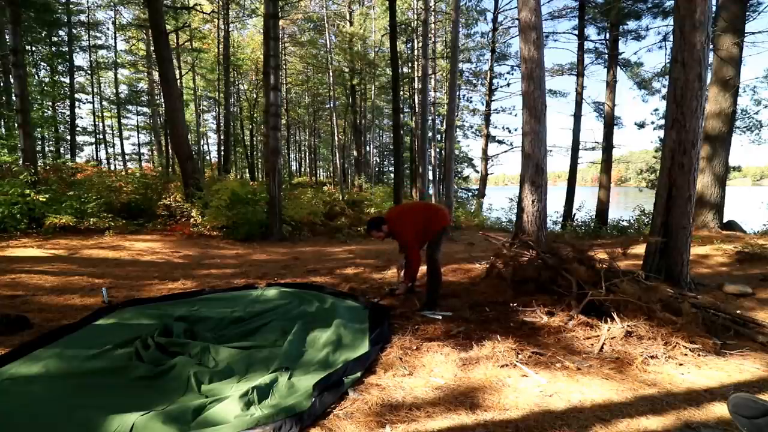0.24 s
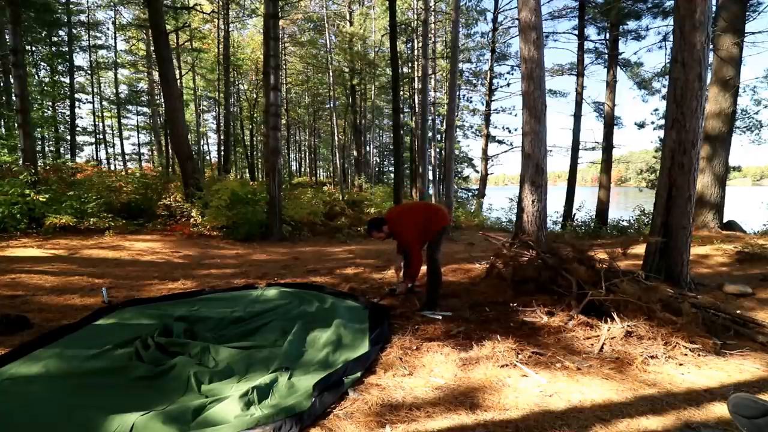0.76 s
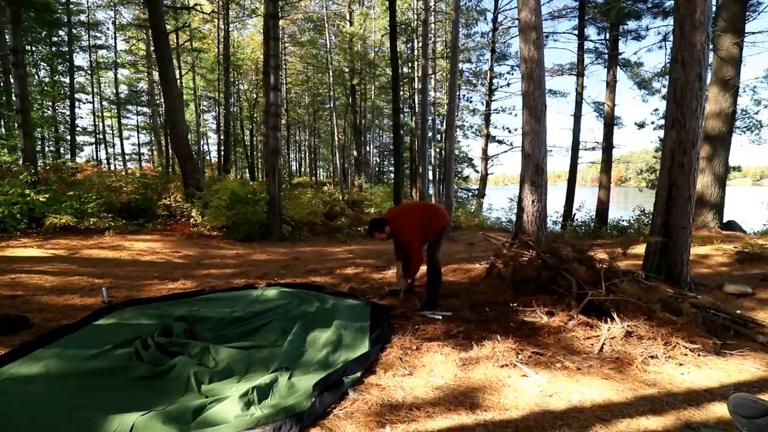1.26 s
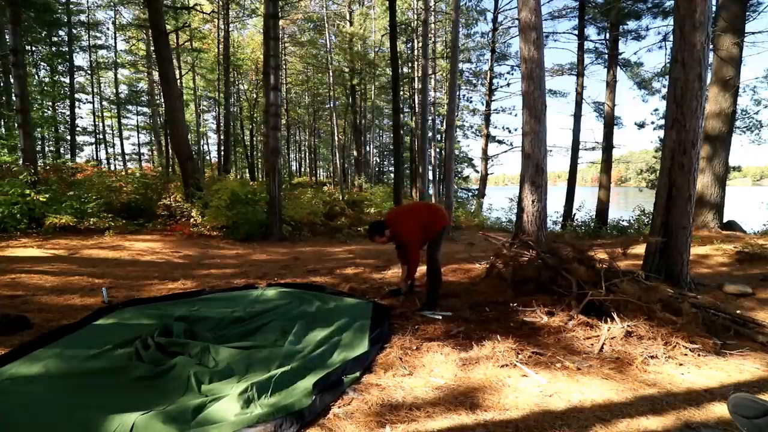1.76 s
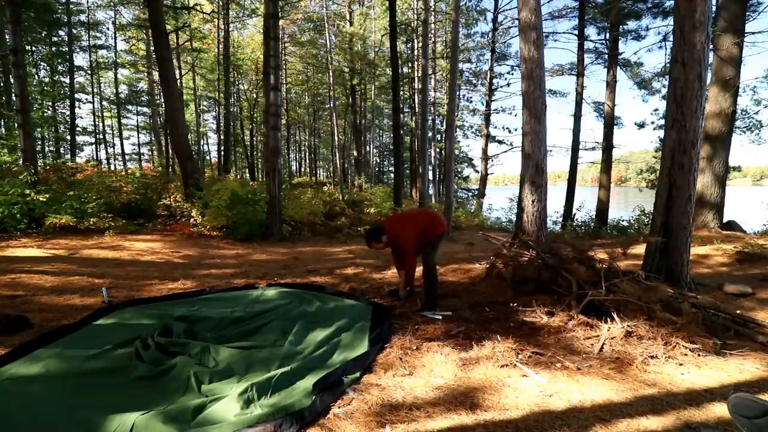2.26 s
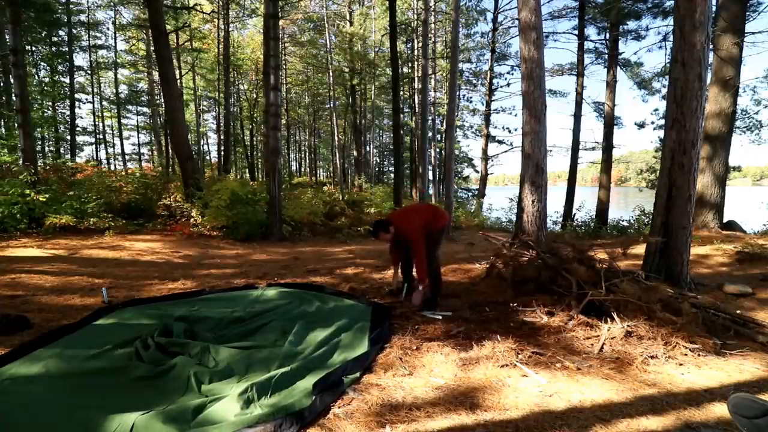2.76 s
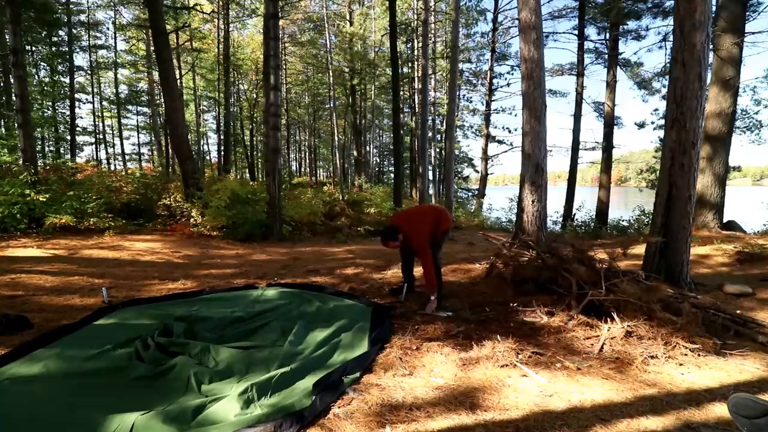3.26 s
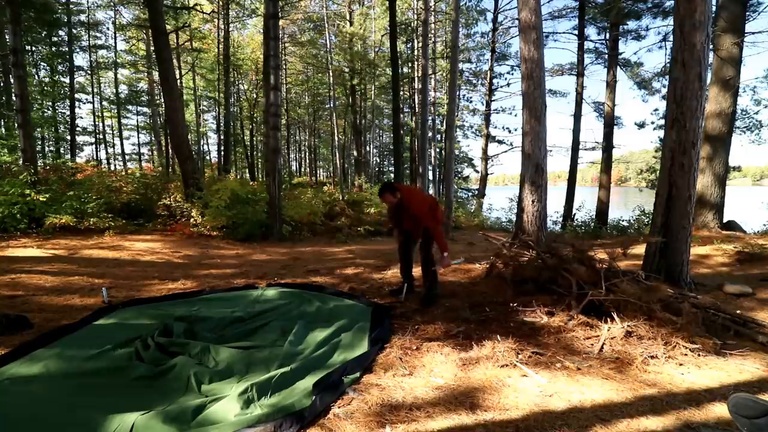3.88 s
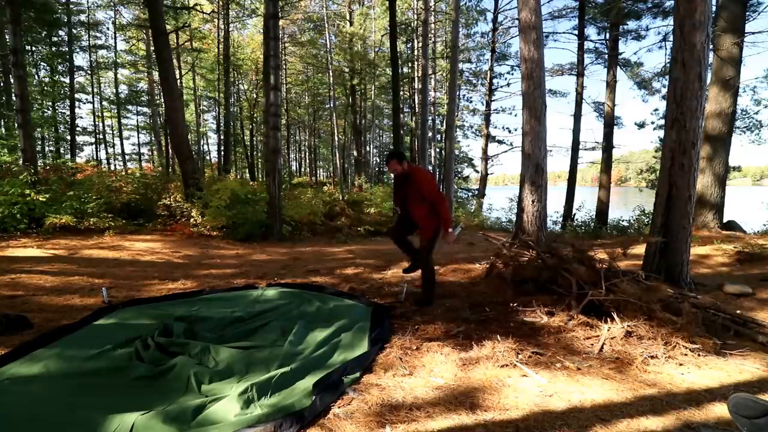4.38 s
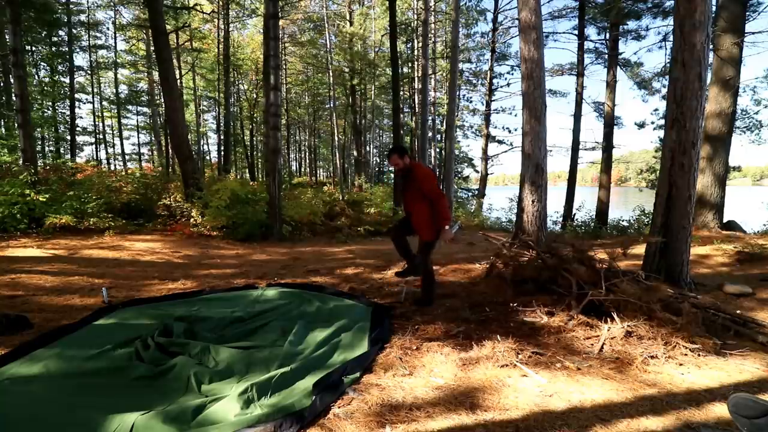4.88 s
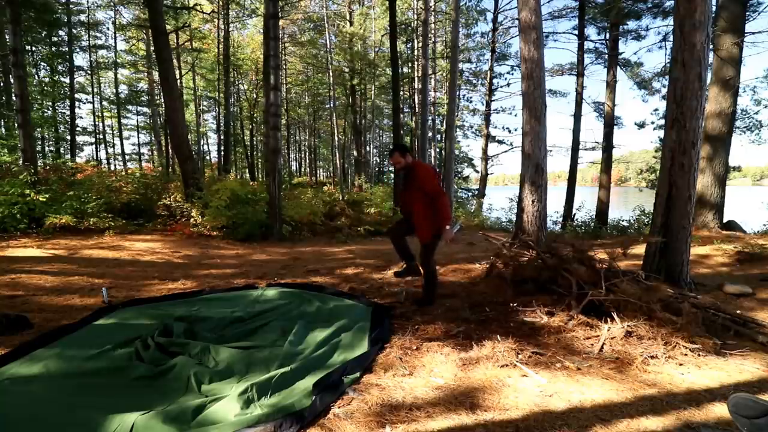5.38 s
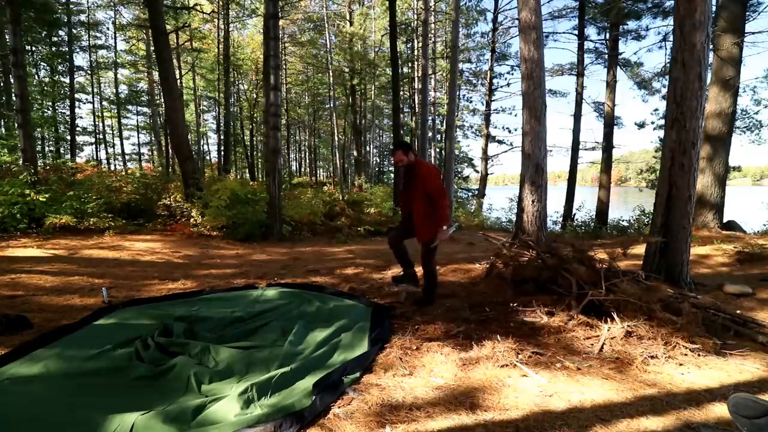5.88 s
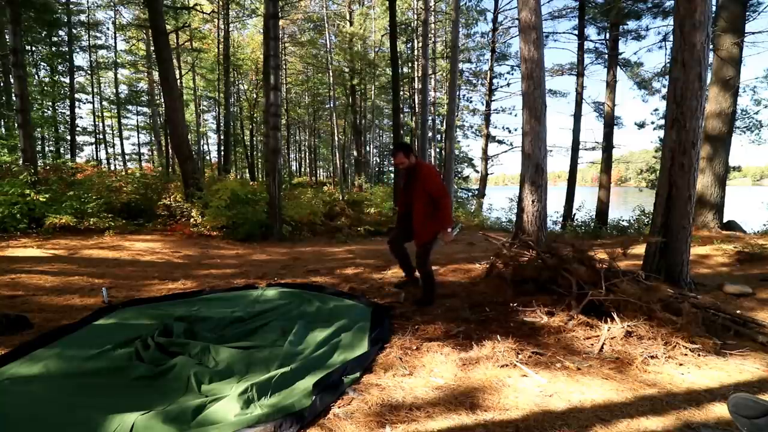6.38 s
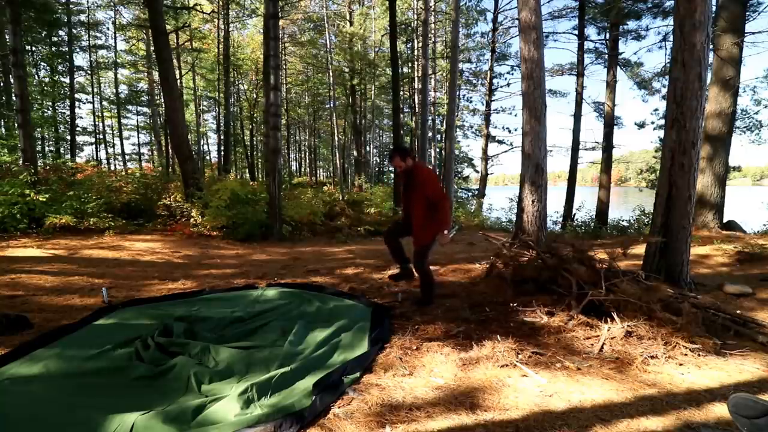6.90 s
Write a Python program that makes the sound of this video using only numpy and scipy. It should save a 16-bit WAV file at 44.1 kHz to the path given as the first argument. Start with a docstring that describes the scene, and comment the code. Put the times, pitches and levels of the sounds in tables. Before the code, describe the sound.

Quiet lakeside pine wood with low hum, distant rush and thin hiss. A tiny water plop, then faint scuffs and rustles in dry needles with a few small ticks. Just after three seconds, thin metal stakes clink and clatter in a hand for about a second. From four and a half seconds a boot stamps about every half second, much louder, with low thuds and brittle twig snaps. Close, with slight scatter from the trunks.

```python
"""Tent stakes and a boot on needle litter

A camper in a pine wood by a lake scuffs the litter (enveloped noise), gathers four thin metal stakes that clink and
clatter (decaying bending modes and contact noise), then stamps one into the ground with a boot (low swings and
rumble, snapping twigs). Trunks scatter the sound; a low hum, drones, a far rush, plops and hiss lie under it."""
import sys
import numpy as np
from scipy import signal
from scipy.fft import rfft, irfft, next_fast_len
from scipy.io import wavfile
from scipy.ndimage import map_coordinates

SR = 44100
rng = np.random.default_rng(int(sys.argv[2]) if len(sys.argv) > 2 else 0)


def log_audio(samples):
    """Write samples as a 16-bit WAV file to the path given in sys.argv[1]."""
    # one column per channel
    frames = np.atleast_2d(samples).T
    # limit to full scale, then quantise
    limited = np.clip(frames, -1, 1)
    pcm = np.round(limited * 32767).astype(np.int16)
    wavfile.write(sys.argv[1], SR, pcm)


N = 315086

# Boot landings. Each row: start in seconds, edge of the sole in dB, flat of the sole in dB, settling in dB,
# ground pitch in Hz, crunch of the needles in dB
THUDS = [(2.328, -27, -33, -42, 359, -51), (2.78, -49, -42, -38, 407, -62),
         (2.828, -35, -39, -29.5, 366, -63), (2.9, -39.5, -54, -60, 350, -61),
         (3.989, -33, -55, -53, 463, -64.5), (4.064, -24.5, -35.5, -38, 368, -44),
         (4.584, -18, -13, -32, 310, -48), (4.6108, -13.5, -25, -27.5, 460, -47.5),
         (4.6334, -21, -31, -48, 279, -63), (5.0677, -9, -13.5, -21.5, 293, -38.5),
         (5.092, -27, -30, -29, 360, -64), (5.119, -26, -41, -43, 196, -68),
         (5.614, -19.5, -15, -22, 340, -51.5), (5.633, -18, -30, -32, 260, -48.5),
         (6.0745, -18.5, -21.5, -27.5, 404, -44), (6.503, -13.5, -11.5, -21, 330, -41),
         (7.0626, -13.5, -11, -25, 315, -35.5), (7.099, -22, -26, -39, 523, -64)]
# Spectrum of bright rubbing. Each row: frequency in Hz, density in dB per Hz before scaling to rms 1
RUSTLE_SPECTRUM = [(1470, -37), (2500, -11.5), (4410, -5.5), (4910, -6.5), (8080, -4), (9960, -12.5),
                   (16000, -17)]


def amp(db):
    """Decibel law: gain of a level in dB."""
    return 10 ** (np.asarray(db) / 20)


def decay(t, t60):
    """Exponential decay: falls 60 dB in t60 seconds."""
    return amp(-60 * t / t60)


def swell_in(t, rise_s):
    """Exponential approach to 1 with time constant rise_s."""
    return 1 - np.exp(-t / rise_s)


def unit(x):
    """Power normalisation: x at rms 1."""
    return x / np.sqrt(np.mean(x ** 2) + 1e-20)


def along(points, hz):
    """Interpolation of (Hz, value) points on a logarithmic frequency axis."""
    f, v = np.transpose(points)
    return np.interp(np.log(hz + 1), np.log(f + 1), v)


def curves(rows, **ends):
    """Linear interpolation in time: one value per sample for each column after the time."""
    s, *cols = np.transpose(rows)
    return [np.interp(np.arange(N) / SR, s, c, **ends) for c in cols]


def wobble(rate):
    """Band-limited fluctuation: a smooth random curve with rate knots a second."""
    return map_coordinates(rng.standard_normal(int(N * rate / SR) + 4), [np.arange(N) * rate / SR])


def filtered(x, response):
    """Linear filtering: the spectrum of x times a response of frequency."""
    m = next_fast_len(N + SR // 2)
    return irfft(rfft(x, m) * response(np.fft.rfftfreq(m, 1 / SR)), m)[..., :N]


def butter(x, edge_hz, kind):
    """Second-order Butterworth filter."""
    return signal.sosfilt(signal.butter(2, edge_hz, kind, fs=SR, output="sos"), x)


def resonances(modes):
    """Sum of damped oscillator responses, each given as centre in Hz, width in Hz and peak in dB."""
    return lambda f: sum(amp(db) * 1j * f * w / (c * c - f * f + 1j * f * w) for c, w, db in modes)


def grit(spectrum, spiky_db, clump_rate):
    """Modulated noise: uneven grains coloured by a spectrum, at rms 1."""
    grains = rng.standard_normal(N) * amp(spiky_db * wobble(clump_rate))
    return unit(filtered(grains, lambda hz: amp(along(spectrum, hz))))


def add(track, s, sound):
    """Superposition: mixes a sound in from time s."""
    part = track[round(s * SR):][:len(sound)]
    part += sound[:len(part)]


def stakes():
    """Modal synthesis: each clink excites bending modes, a tick and a rattle; later contacts damp the ring."""
    # Bending modes. Each row: nominal mode frequencies of one stake in Hz; the last stake is held tightest
    mode_hz = [
        [834, 1210, 1954, 2430, 3214, 4180, 4292, 4795, 6481, 7952, 8295, 9425, 10270, 11890],
        [1136, 1863, 2266, 2450, 3161, 4583, 4644, 5950, 6155, 6375, 8062, 9245, 10020],
        [3205, 4105, 5816, 6215, 7748, 8740, 8888, 12558, 13720, 14690, 15200],
        [1950, 2315, 2465, 2540, 2850, 3195, 3430, 3600, 4230, 4420, 5900, 6190, 6670, 8400],
    ]
    # Strength of the same modes. Each row: one stake, as pairs of relative level in dB and free t60 in seconds
    mode_rings = [
        [(-18.5, 0.25), (-21, 0.16), (-14.5, 0.35), (-16, 0.25), (-13.5, 0.22), (-25, 0.14), (-7, 0.14),
         (-12.5, 0.35), (-3.5, .15), (-7, 0.165), (-4.5, 0.14), (-10.5, 0.086), (-15.5, 0.22), (-20, 0.16)],
        [(-22.5, .15), (-19, .2), (-24, 0.3), (-11, 0.33), (-10, 0.33), (-12, .13), (-8, 0.64), (-25, 0.38),
         (-1, 0.12), (-6, 0.194), (-25, 0.12), (-2.5, 0.13), (-15.5, 0.091)],
        [(-22, .25), (-10, 0.41), (2, 0.17), (-5, 0.3), (-6, .22), (-13.5, 0.39), (-3, 0.27), (-11.5, 0.19),
         (-22.5, 0.25), (-24, .12), (-19, 0.173)],
        [(-14.5, 0.17), (-30.5, 0.13), (-9.5, 0.293), (-5, 0.12), (-14, 0.092), (-5, 0.166), (-4.5, 0.099),
         (-12, 0.11), (-2, 0.12), (-23, 0.051), (-22, 0.104), (-21, 0.071), (-49, 0.052), (-22.5, 0.05)],
    ]
    # Contacts. Each row: start in seconds, relative level of each of the four stakes in dB, grip from 0 to 1,
    # tilt in dB per octave, tick in dB before its band filter, rattle in dB, steady time of the rattle in seconds
    clinks = [(3.076, -46.5, -57, -45.5, -40, 0, -2.5, -48, -58, 0.012),
              (3.094, -21.5, -47, -32.5, -54, 0, -3, -22, -41, 0.037),
              (3.141, -33.5, -44.5, -30.5, -29, 0.43, -1.5, -34, -33, 0.016),
              (3.3027, -23.5, -20, -34.5, -48, 0, 0.5, -29, -24.5, 0.0038),
              (3.312, -35, -17.5, -26.5, -33, 0.099, -0.5, -27.5, -30.5, .012),
              (3.413, -22.5, -17, -11.5, -35, 0.19, -1.5, -8, -28.5, .012),
              (3.43, -12.5, -17, -20, -17.5, 0, 4, 1, -27, 0.012),
              (3.456, -40.5, -29.5, -10.5, -35, 0.17, -5, -16, -30.5, 0.012),
              (3.502, -25.5, -44, -27, -40, 0.2, -1, -28, -42, 0.055),
              (3.612, -27.5, -44, -35, -42, 1, 6.5, -20.5, -35.5, 0.025),
              (3.632, -26, -51, -52, -47, 0.091, 0.5, -44.5, -36, 0.047),
              (3.691, -48, -48, -48, -31.5, 0.066, 4, -47, -43, 0.032),
              (3.719, -55, -48, -45, -56, 0.49, -5, -53, -40.5, 0.027),
              (3.747, -50, -48, -57, -34.5, 0.017, -.5, -44, -42.5, 0.014),
              (3.865, -60, -43, -54, -33.5, 0.33, -3, -29, -45, 0.0082),
              (4.03, -44, -49, -44, -8, 0.94, 7.5, -32.5, -22, 0.012),
              (4.079, -44, -46.5, -49, -42, .6, 5, -31.5, -31, 0.0096),
              (4.091, -28.5, -52, -37.5, -23, 0.67, 8.5, -19, -23.5, 0.011),
              (4.107, -64, -48, -38.5, -14, 0.9, -15.5, -35.5, -26.5, 0.0069),
              (4.123, -44, -52, -53, -29, 0.77, -16, -47.5, -33, 0.0093)]
    # Contact noise of the bundle. Each row: frequency in Hz, relative density in dB per Hz before the resonances
    jangle_spectrum = [(290, -52), (500, -10.5), (1380, -7), (2160, -5.5), (2460, 2), (2690, -6.5),
                       (4210, 0.5), (7310, -10.5), (8090, -9.5), (16000, -48)]
    # A stake drawn along the others. Each row: time in seconds, level in dB
    slide_levels = [(.945, -63), (1.0, -58), (1.17, -49.5), (1.23, -50.5), (1.265, -68)]
    faint_db = -55  # a tick this weak is a mere brush
    brush_rise_s, quicker_db = 0.024, 0.93  # rise of a brush; dB the rise shortens per dB of tick above it
    choke_db, choke_s = 0.7, 0.00346  # dB taken from the earlier ring per dB of tick above a brush; onset time
    tick_t60_s, rattle_t60_s = 0.0023, 0.06

    out, ticks, rattle, t = np.zeros(N), np.zeros(N), np.zeros(N), np.arange(SR // 3) / SR
    for s, *levels, grip, tilt_db, tick_db, rattle_db, lasts in clinks:
        hand = 1 + 4 * np.clip(grip, 0, 1)  # the grip speeds the decay
        swell = swell_in(t, brush_rise_s * amp(-quicker_db * (tick_db - faint_db)))
        contact_db = np.zeros(len(t))
        for later_s, *_, later_tick_db, _, _ in clinks:
            if later_s > s:
                contact_db += max(later_tick_db - faint_db, 0) * np.clip((t - later_s + s) / choke_s, 0, 1)
        choke = amp(-choke_db * contact_db)
        for hz, ring, stake_db in zip(mode_hz, mode_rings, levels):
            hz = np.array(hz)[:, None]
            db, t60 = np.transpose(ring)[:, :, None]
            chance = rng.standard_normal((4, len(ring), 1))
            strength_db = stake_db + db + tilt_db * np.log2(hz / 4000) + chance[1]
            phase = 2 * np.pi * hz * (1 + 0.0006 * chance[2]) * t + chance[0]
            # A bent stake splits each mode, which then beats
            beat = 1 + 0.35 * np.cos(2 * np.pi * 30 * chance[3] * t + 2 * chance[0])
            tones = beat * amp(strength_db) * decay(t * hand, t60) * np.sin(phase)
            add(out, s, swell * choke * tones.sum(0))
        add(ticks, s, amp(tick_db) * decay(t, tick_t60_s) * rng.standard_normal(len(t)))
        add(rattle, s, amp(rattle_db) * decay(np.maximum(t - lasts, 0), rattle_t60_s) * swell)

    # Touching stakes widen each other's modes
    wide_modes = [(hz, 140, db / 2) for hz, (db, _) in zip(sum(mode_hz, []), sum(mode_rings, []))]
    blurred = resonances(wide_modes)
    jangle = filtered(grit(jangle_spectrum, spiky_db=3.0, clump_rate=620), lambda f: 0.6 + blurred(f))

    def slide_response(f):
        """Widened modes with a gentle loss below 5 kHz."""
        return (1.0 + blurred(f)) * (f / 5000) ** 2 / (1 + (f / 5000) ** 2)

    slide = filtered(grit(RUSTLE_SPECTRUM, spiky_db=1.5, clump_rate=85), slide_response)
    slide_gain = amp(curves(slide_levels, left=-120, right=-120)[0])
    return out + butter(ticks, [1500, 11000], "bp") + rattle * unit(jangle) + slide_gain * unit(slide)


def boot():
    """Impact on soft ground: edge, flat and settling each give a damped swing, then rumble around its pitch."""
    flat_s, settle_s = 0.00397, 0.013  # delays after the edge
    swing_t60_s, land_t60_s, settle_t60_s = 0.02, 0.037, 0.14
    settle_pitch = 1.37  # packed ground sounds higher, over the landing pitch
    # The ground under the litter gives; level is relative to the harder of edge and flat
    boom_hz, boom_db, boom_t60_s, boom_rise_s = 124.4, -24, 0.19, 0.012

    out, t = np.zeros(N), np.arange(SR // 3) / SR
    boom = decay(t, boom_t60_s) * swell_in(t, boom_rise_s) * np.sin(2 * np.pi * boom_hz * t)
    for land, edge_db, flat_db, settle_db, ground_hz, _ in THUDS:
        contacts = [(land, edge_db, ground_hz, land_t60_s),
                    (land + flat_s, flat_db, ground_hz, land_t60_s),
                    (land + settle_s, settle_db, settle_pitch * ground_hz, settle_t60_s)]
        for s, db, hz, t60 in contacts:
            swing = np.sin(2 * np.pi * hz * t) * decay(t, swing_t60_s)
            lumps = unit(butter(rng.standard_normal(len(t)), [0.3 * hz, 1.46 * hz], "bp"))
            rumble = 0.33 * lumps * decay(t, t60) * swell_in(t, 0.0006)
            add(out, s, amp(db) * (swing + rumble))
        add(out, land, amp(max(edge_db, flat_db) + boom_db) * boom)
    return butter(out, 95, "hp")  # a small sole moves little deep bass


def breaking_litter():
    """Brittle fracture: snaps of about one cycle, brief twig resonances, and noise of splinters and crunch."""
    # Twigs and needles breaking. Each row: start in seconds, snap in dB, snap pitch in Hz, splinters in dB
    snaps = [(.954, -45, 5000, -44), (0.976, -43, 2000, -54), (2.255, -33, 3870, -60.5),
             (2.328, -23, 1310, -41), (2.394, -32.5, 1420, -65), (2.668, -38, 1170, -55.5),
             (2.774, -43, 4000, -44), (3.989, -26.5, 1600, -44.5), (4.065, -39, 7000, -26.5),
             (4.583, -24, 1500, -66), (4.61, -3, 2230, -16), (4.611, -10, 1300, -29),
             (4.627, -32, 3005, -29), (4.664, -27, 4080, -37.5), (4.882, -35.5, 3940, -55),
             (5.055, -32, 4000, -49), (5.0688, -14, 1780, -41), (5.081, -15, 4470, -21.5),
             (5.086, -26, 5500, -25), (5.091, -27, 5500, -28), (5.13, -29.5, 1800, -57),
             (5.613, -19.5, 1550, -36.5), (5.6132, -18.5, 1270, -49.5), (5.625, -39, 5910, -35),
             (5.634, -22, 6100, -40.5), (5.655, -33, 1800, -55), (6.074, -25.5, 1930, -60),
             (6.088, -26, 4480, -48), (6.111, -29, 2980, -56), (6.135, -32.5, 1390, -60),
             (6.49, -39, 3500, -43.5), (6.503, -15, 2370, -95), (6.519, -20.5, 3900, -45),
             (6.59, -28, 1500, -44), (6.597, -19, 1790, -44), (7.064, -25, 1850, -50),
             (7.137, -26.5, 2200, -61)]
    # Spectrum of the crunch. Each row: frequency in Hz, density in dB per Hz before scaling to rms 1
    crunch_spectrum = [(410, -36), (700, -6.5), (1230, -15.5), (4150, -8.5), (4990, -9), (5990, -7),
                       (7010, -11.5), (16000, -27)]
    ring_db, ring_cycles = -14.5, 10.3  # a dry twig rings on: dB relative to the snap, cycles to fall 60 dB
    splinter_t60_s, crunch_t60_s = 0.022, 0.21

    out, crunch, t = np.zeros(N), np.zeros(N), np.arange(SR // 3) / SR
    for s, db, hz, splinter_db in snaps:
        cycles = hz * t - 0.6  # from the centre of the snap
        add(out, s, -amp(db) * np.cos(2 * np.pi * cycles) * np.exp(-(2.6 * cycles) ** 2))
        add(out, s, amp(db + ring_db) * decay(hz * t, ring_cycles) * np.sin(2 * np.pi * hz * t))
        add(crunch, s, amp(splinter_db) * decay(t, splinter_t60_s))
    for s, *_, crunch_db in THUDS:
        add(crunch, s, amp(crunch_db) * decay(t, crunch_t60_s))
    # Snaps and their rings lose everything below 250 Hz
    return butter(out, 250, "hp") + crunch * grit(crunch_spectrum, spiky_db=3.0, clump_rate=660)


def scuffing():
    """Friction noise: strokes of hands and feet open and close a coarse scrape and a bright rustle."""
    # Strokes. Each row: start in seconds, rise in seconds, hold in seconds, fall in seconds, scrape in dB, rustle in dB
    strokes = [(1.298, .035, 0.034, 0.11, -50.5, -55.5), (1.358, .12, .14, 0.15, -51.5, -58),
               (1.681, 0.12, 0.019, 0.15, -48, -55.5), (1.94, 0.23, .01, 0.2, -56, -60),
               (2.325, 0.083, 0.021, 0.12, -52, -65), (2.72, 0.059, 0.075, 0.063, -47, -70),
               (2.731, 0.093, 0.021, 0.049, -66, -38.5)]
    # Spectrum of the scrape. Each row: frequency in Hz, density in dB per Hz before scaling to rms 1
    scrape_spectrum = [(120, -35), (200, -17.5), (353, -1), (385, -5), (751, -2), (957, -0.5),
                       (6000, -13.5), (7800, -48), (13200, -120)]
    edge_db = 18  # a stroke rises and falls through this range
    shapes = []
    for s, rise, hold, fall, *_ in strokes:
        top, end = s + rise, s + rise + hold
        points = [(s, -edge_db), (top, 0), (end, 0), (end + fall, -edge_db)]
        shapes.append(amp(curves(points, left=-120, right=-120)[0]))
    scrape, rustle = amp(np.transpose(strokes)[-2:]) @ shapes
    out = scrape * grit(scrape_spectrum, spiky_db=1.5, clump_rate=150)
    return out + rustle * grit(RUSTLE_SPECTRUM, spiky_db=3.0, clump_rate=590)


def trees(x):
    """Diffuse scattering: convolution with a noise tail whose decay depends on frequency."""
    # Answer of the trunks. Each row: frequency in Hz, t60 in seconds
    trunk_t60 = [(200, 0.35), (2000, 0.44), (10000, 0.45)]
    hz, t, z = signal.stft(rng.standard_normal(SR // 2), SR, nperseg=256)
    tail = signal.istft(z * decay(t, along(trunk_t60, hz)[:, None]), SR, nperseg=256)[1]
    delayed = np.pad(x, (400, 0))  # 9 ms
    return signal.fftconvolve(delayed, tail / np.linalg.norm(tail))[:N]


def plops():
    """Damped oscillation: water at the shore as soft-edged decaying sines."""
    # Plops. Each row: start in seconds, level in dB before the soft rise, pitch in Hz, t60 in seconds
    shore = [(0.421, -46, 1060, 0.082), (0.469, -54, 1060, .03), (5.79, -48, 1060, 0.093),
             (6.755, -48.5, 1008, 0.098)]
    out, t = np.zeros(N), np.arange(SR // 5) / SR
    for s, db, hz, t60 in shore:
        add(out, s, amp(db) * decay(t, t60) * swell_in(t, 0.0064) * np.sin(2 * np.pi * hz * t))
    return out


def hum():
    """Harmonic series: a slowly wandering fundamental and a few overtones, nearly steady in level."""
    # Course of the hum. Each row: time in seconds, mean fundamental in Hz, reference rms in dB
    course = [(0, 70.6, -55), (1.3, 70.7, -56), (1.8, 69.6, -56.5), (4.3, 69.3, -55.5), (5.6, 69.1, -52.5),
              (7.14, 69, -51.5)]
    # Harmonics. Each row: multiple of the fundamental, mean level in dB relative to the reference
    harmonics = [(1, -2), (2, -15), (3, -24), (6, -19.5)]
    hum_hz, hum_db = curves(course)
    turn = 2 * np.pi * np.cumsum(hum_hz + 0.39 * wobble(5)) / SR
    return np.sqrt(2) * amp(hum_db) * sum(amp(db + wobble(4)) * np.sin(k * turn) for k, db in harmonics)


def rush_and_drones():
    """Resonant filtering of noise: broad peaks give a far rush, narrow ones two wavering tones."""
    # Course of the levels. Each row: time in seconds, mean far rush in dB, drones in dB before a 2 dB cut
    course = [(0, -65, -59), (.9, -60.5, -71.5), (4.2, -56.5, -66.5), (4.8, -58, -63), (5.6, -59, -55),
              (6.8, -59, -67.5), (7.14, -57.5, -70)]
    # Peaks of the far rush. Each row: centre in Hz, width in Hz, relative level in dB
    rush_peaks = [(470, 43, 0.5), (230, 320, 5.5), (973, 1100, -16), (115.4, 32, 12)]
    # Peaks of the drones, applied twice. Each row: centre in Hz, width in Hz, relative level in dB per pass
    drone_peaks = [(120, 5, 0), (384, 45, 4)]
    rush_db, drone_db = curves(course)
    rush = unit(filtered(rng.standard_normal(N), resonances(rush_peaks)))
    drones = unit(filtered(rng.standard_normal(N), lambda f: resonances(drone_peaks)(f) ** 2))
    return amp(rush_db + 2.2 * wobble(7.8)) * rush + amp(drone_db - 2.0) * drones


def air():
    """Stationary coloured noise: a smooth, steady hiss."""
    # Spectrum of the hiss. Each row: frequency in Hz, density in dB per Hz before scaling to rms 1
    air_spectrum = [(12, -51), (20, -11.5), (43, -23.5), (52, -22), (75, -14), (151, -11.5), (179, -39),
                    (258, -18.5), (332, -22), (372, -19), (535, -23.5), (1050, -20), (1690, -25.5),
                    (14700, -28), (16500, -48.5)]
    return amp(-58.5) * grit(air_spectrum, spiky_db=-0.1, clump_rate=27.0)


def scene():
    """Superposition of sources, their scattered answer and the background, alike in both channels."""
    near = stakes() + boot() + breaking_litter() + scuffing()
    background = plops() + hum() + rush_and_drones() + air()
    mid = near + amp(-16.5) * trees(near) + background
    return np.array([mid, mid])


def record(dry):
    """Level-dependent gain ducks after loud moments; peaks clip, opposed hiss joins, the band ends."""
    top_hz = 15900
    hiss_spectrum = [(30, 4.5), (300, 5.5), (2000, 1), (12000, 2.5)]  # Hz, relative dB
    loud = signal.lfilter([.0006], [1, .0006 - 1], abs(dry[0]))  # running mean over about 38 ms
    held = np.clip(dry / (1 + loud / .3), -.92, .92)
    hiss = amp(-65) * filtered(rng.standard_normal(N), lambda hz: amp(along(hiss_spectrum, hz)))
    opposed = hiss * [[1], [-1]]  # opposite polarity in the two channels
    return filtered(held + opposed, lambda hz: hz < top_hz)


dry = scene()
out = record(dry)
log_audio(out)
```